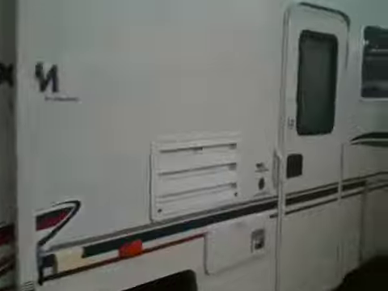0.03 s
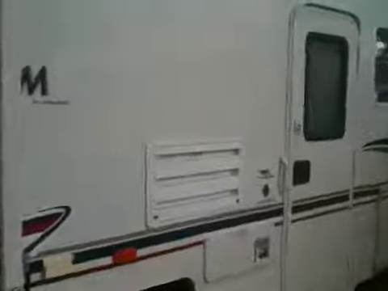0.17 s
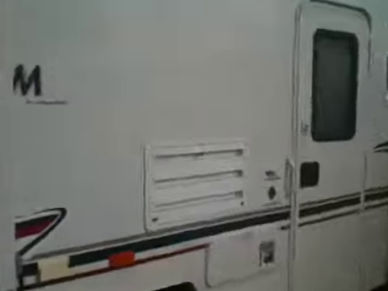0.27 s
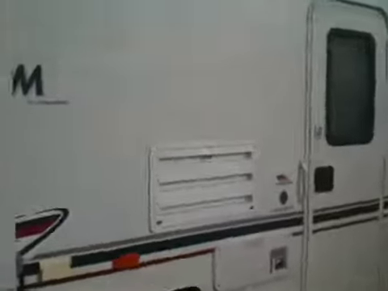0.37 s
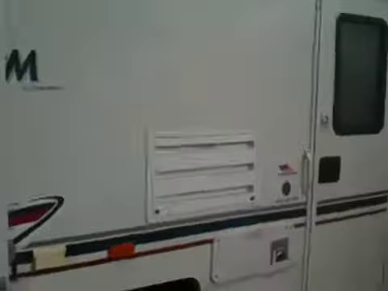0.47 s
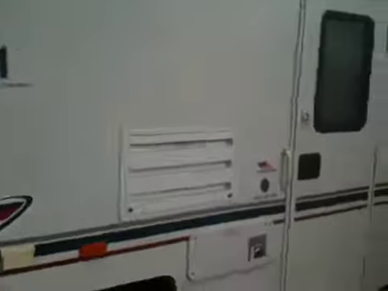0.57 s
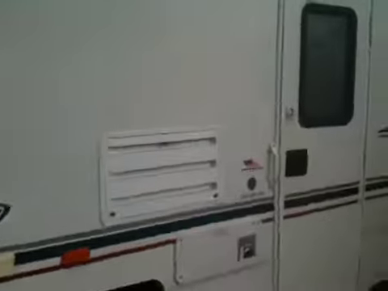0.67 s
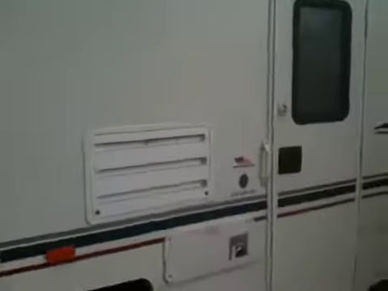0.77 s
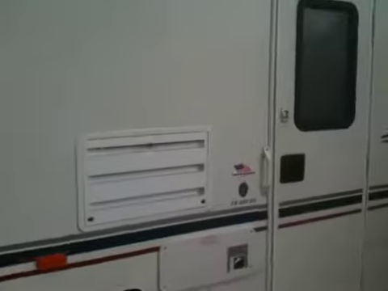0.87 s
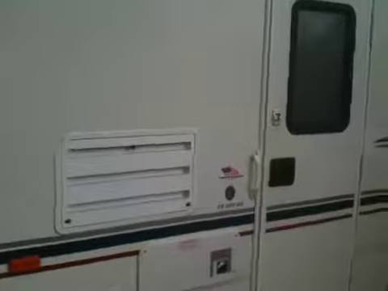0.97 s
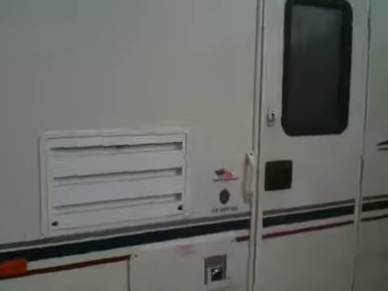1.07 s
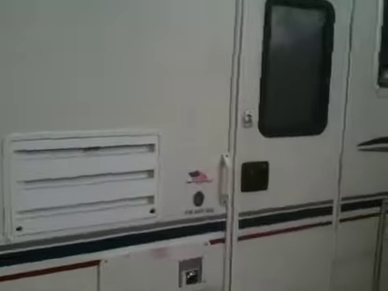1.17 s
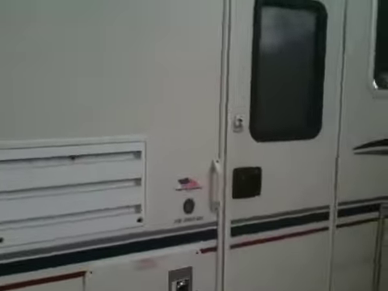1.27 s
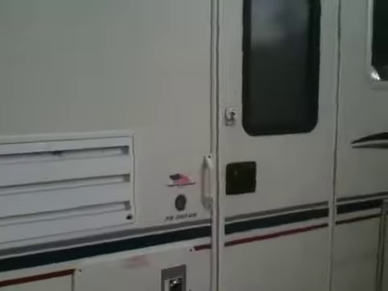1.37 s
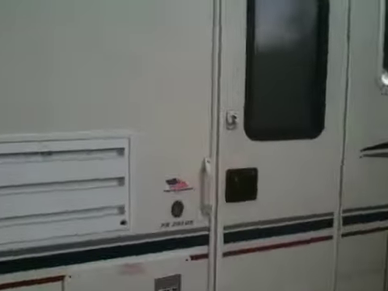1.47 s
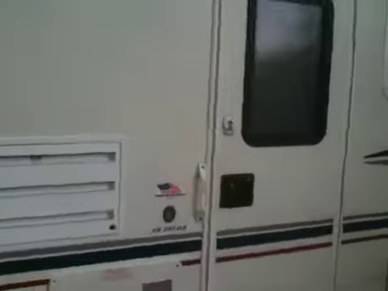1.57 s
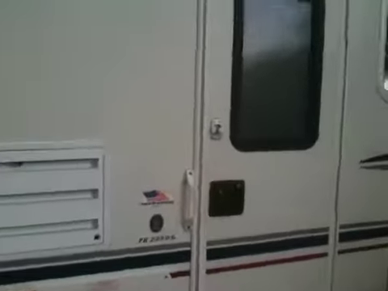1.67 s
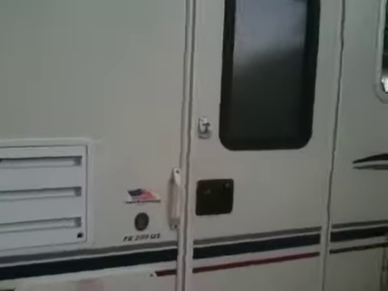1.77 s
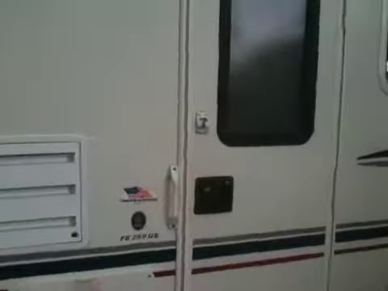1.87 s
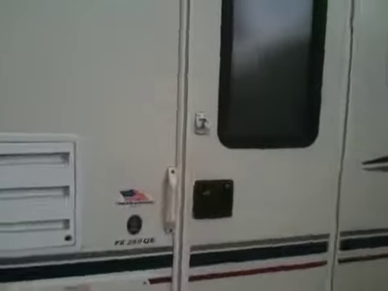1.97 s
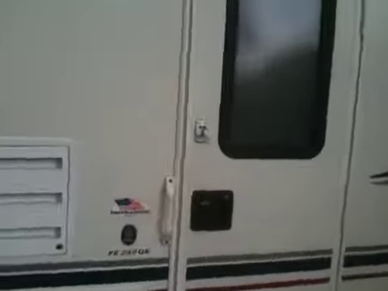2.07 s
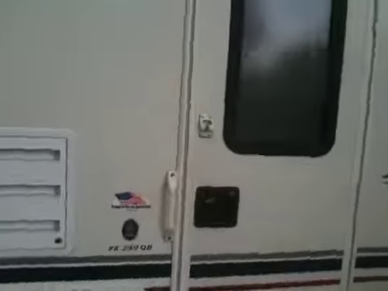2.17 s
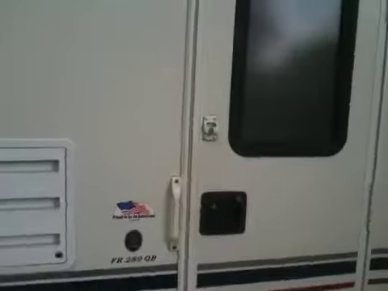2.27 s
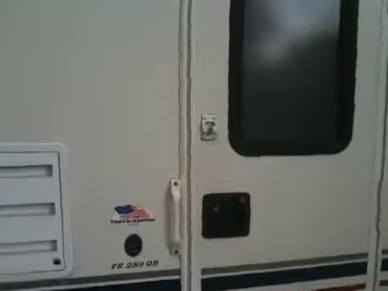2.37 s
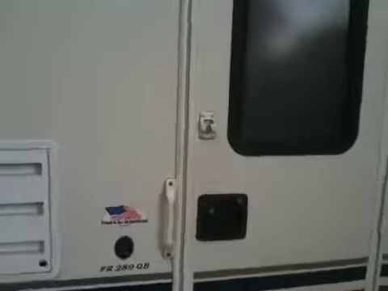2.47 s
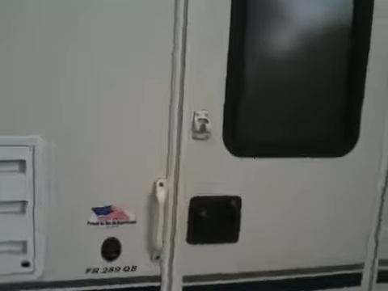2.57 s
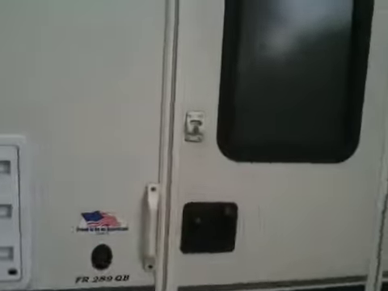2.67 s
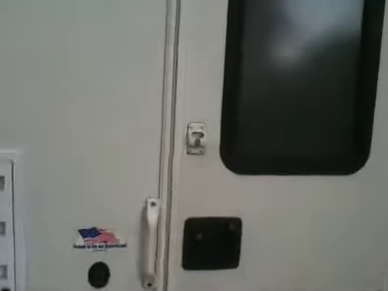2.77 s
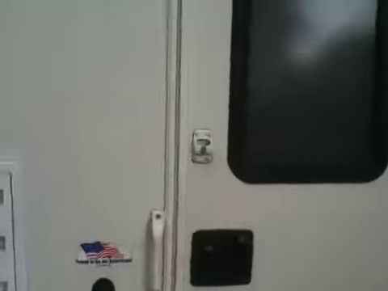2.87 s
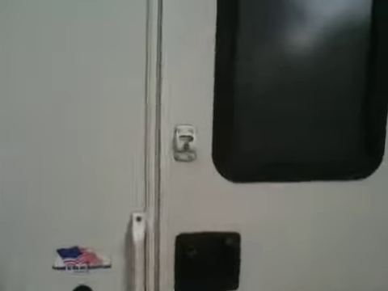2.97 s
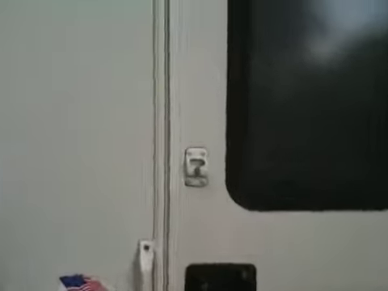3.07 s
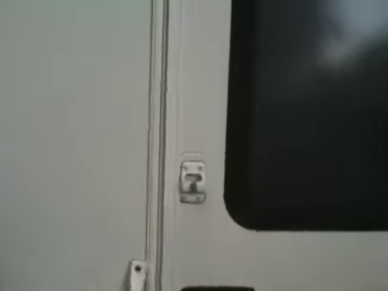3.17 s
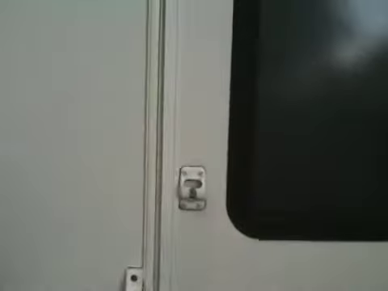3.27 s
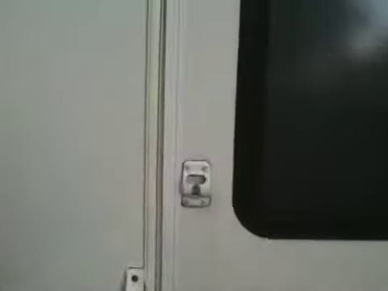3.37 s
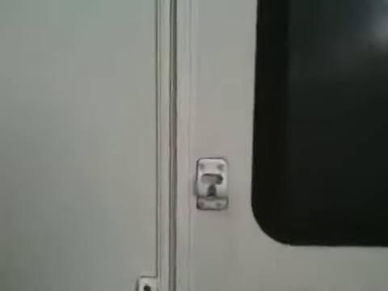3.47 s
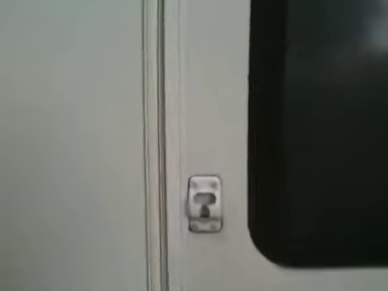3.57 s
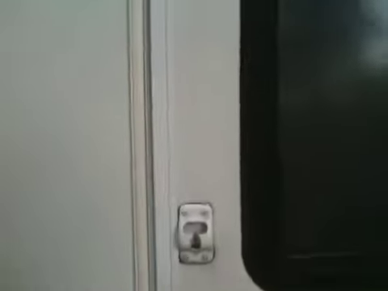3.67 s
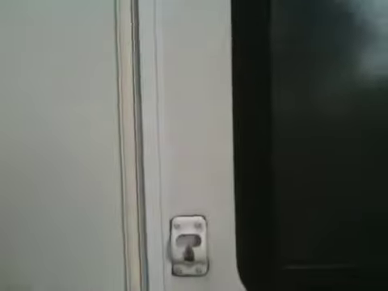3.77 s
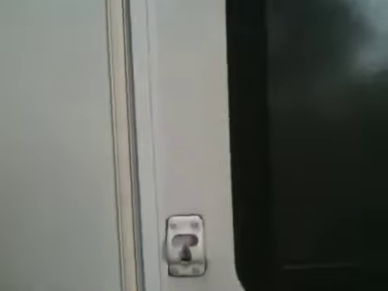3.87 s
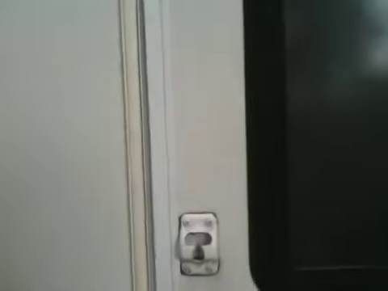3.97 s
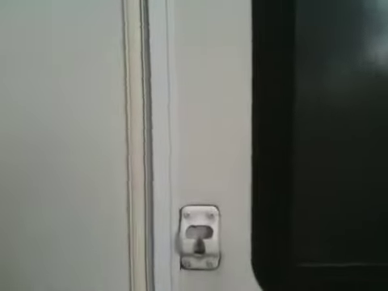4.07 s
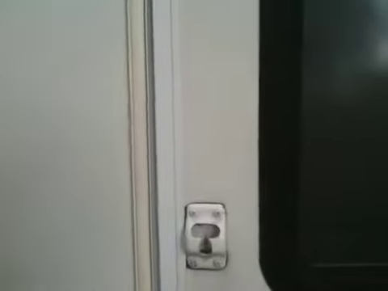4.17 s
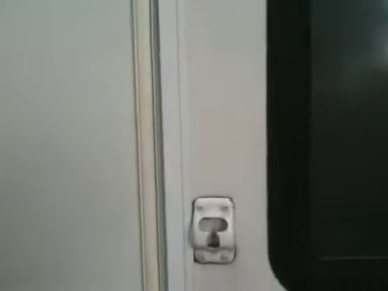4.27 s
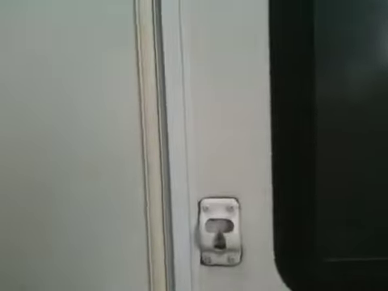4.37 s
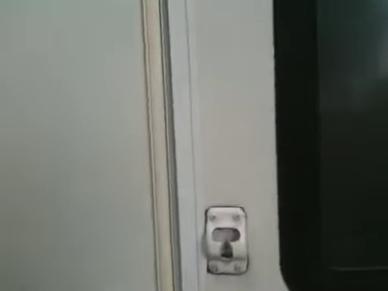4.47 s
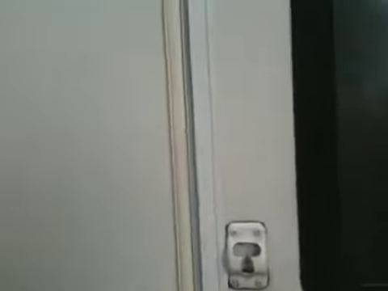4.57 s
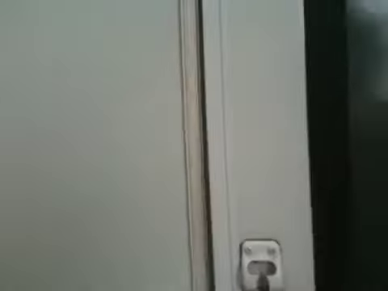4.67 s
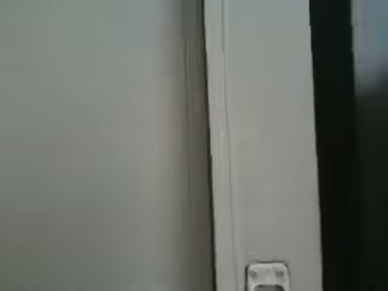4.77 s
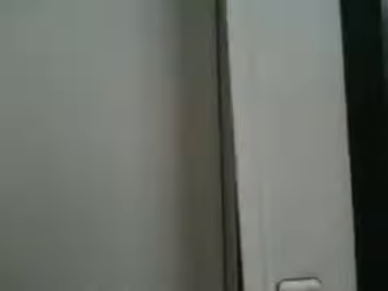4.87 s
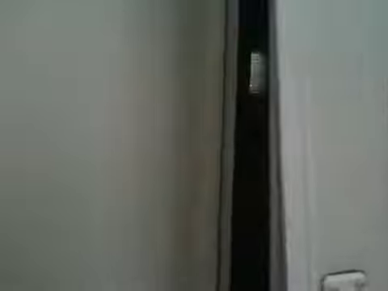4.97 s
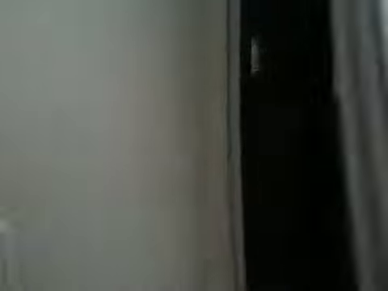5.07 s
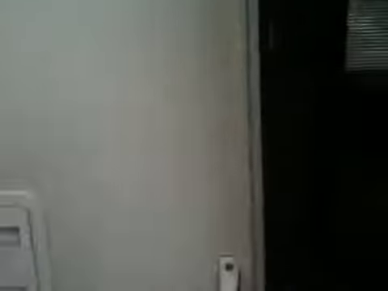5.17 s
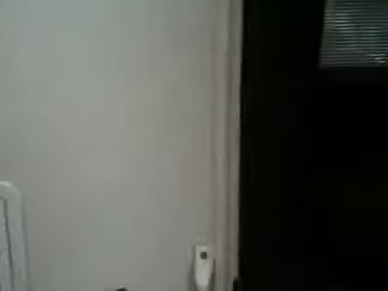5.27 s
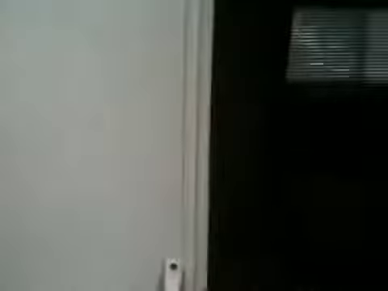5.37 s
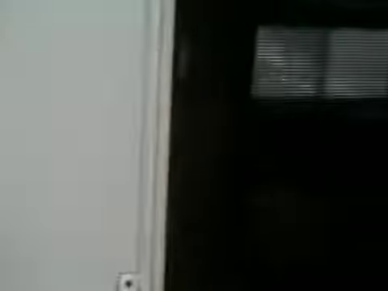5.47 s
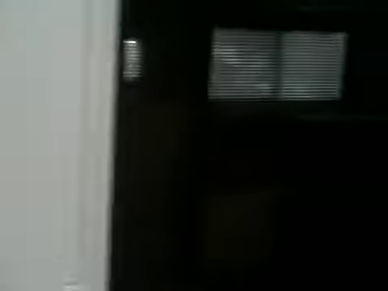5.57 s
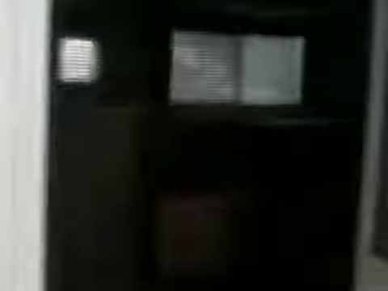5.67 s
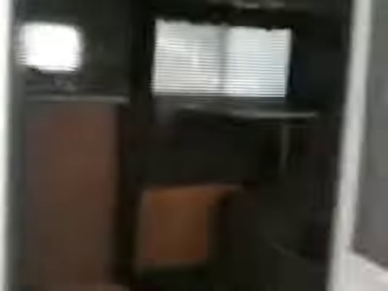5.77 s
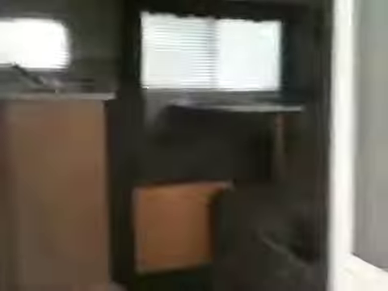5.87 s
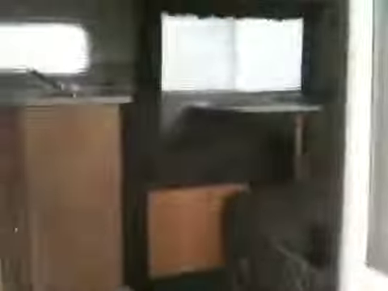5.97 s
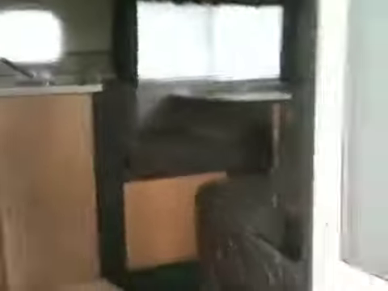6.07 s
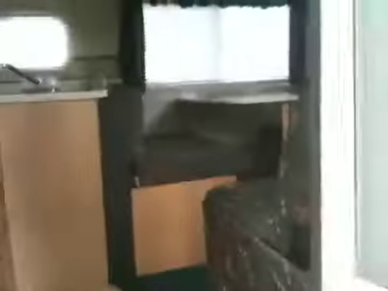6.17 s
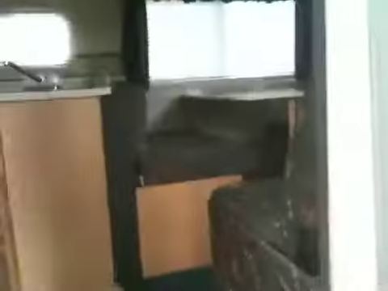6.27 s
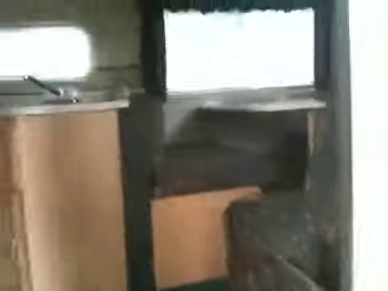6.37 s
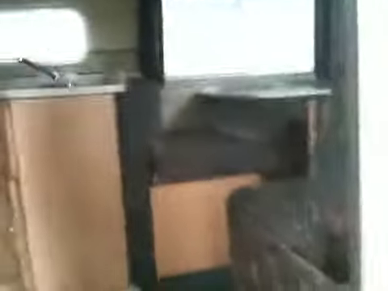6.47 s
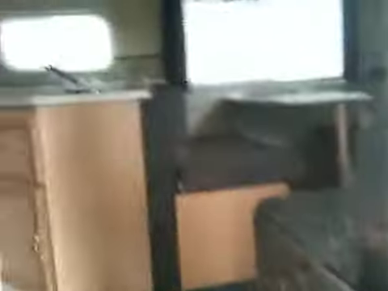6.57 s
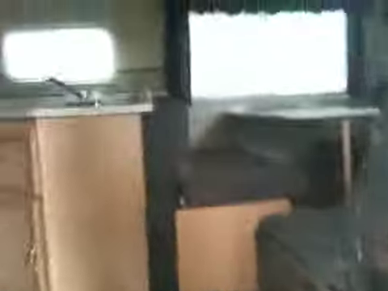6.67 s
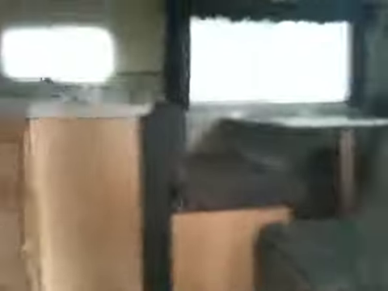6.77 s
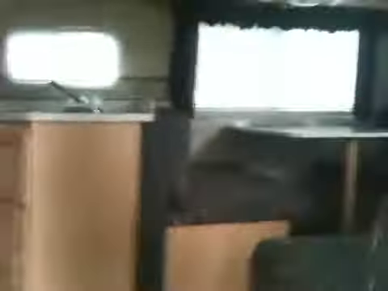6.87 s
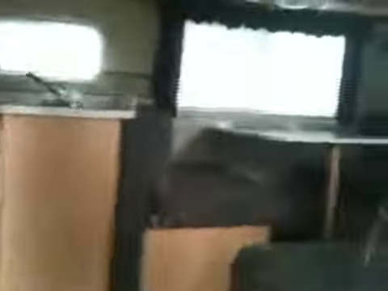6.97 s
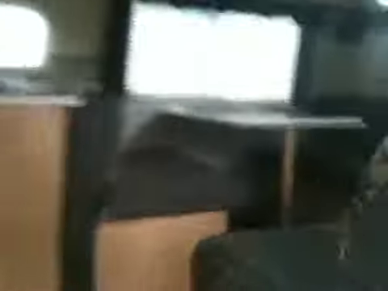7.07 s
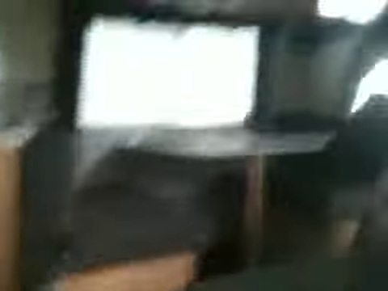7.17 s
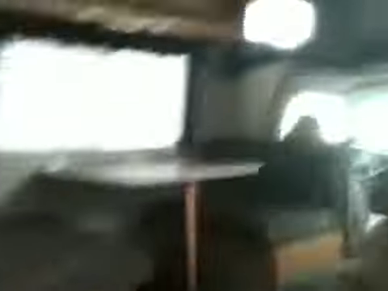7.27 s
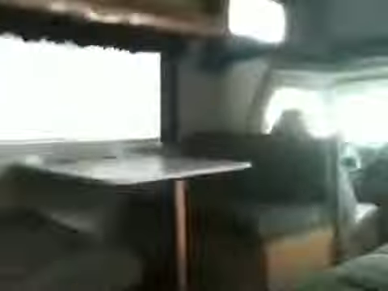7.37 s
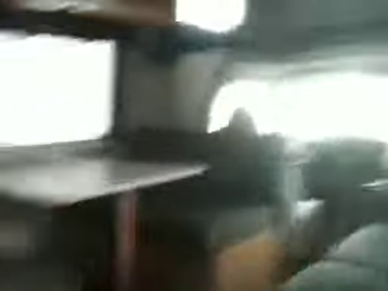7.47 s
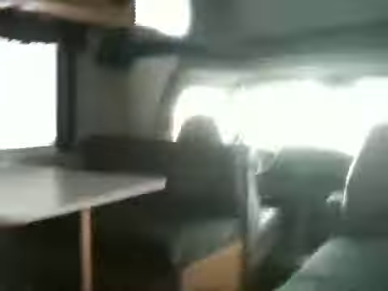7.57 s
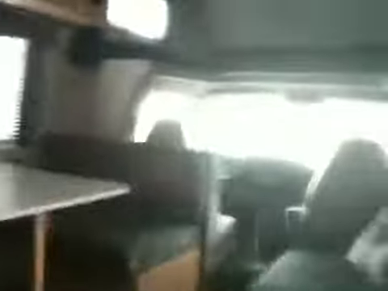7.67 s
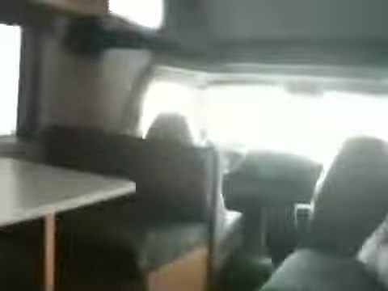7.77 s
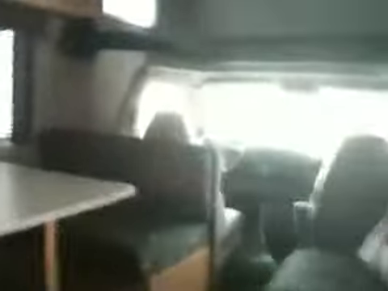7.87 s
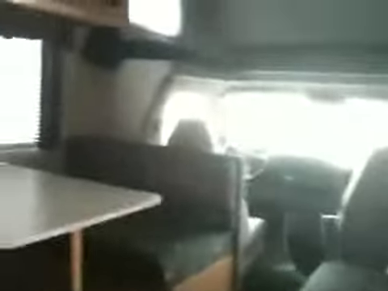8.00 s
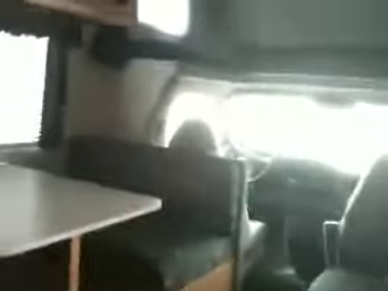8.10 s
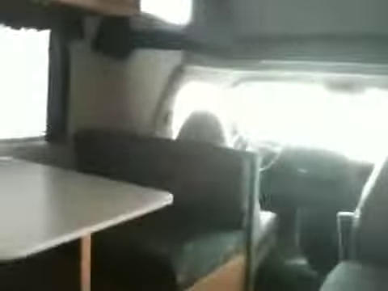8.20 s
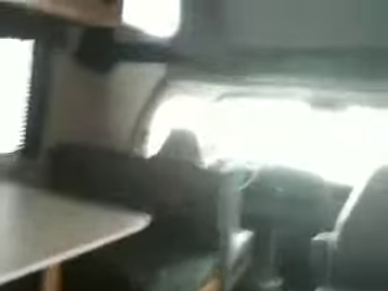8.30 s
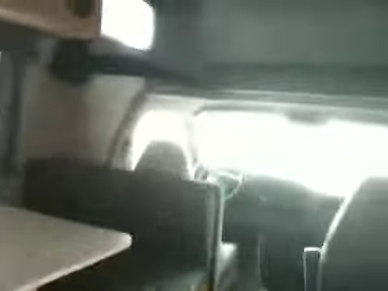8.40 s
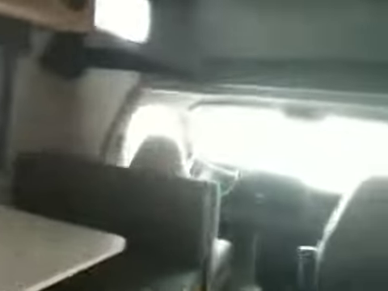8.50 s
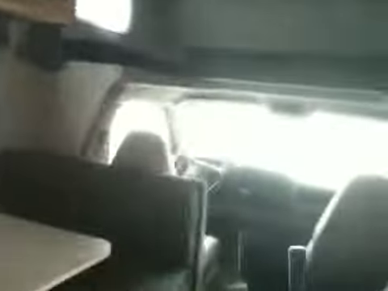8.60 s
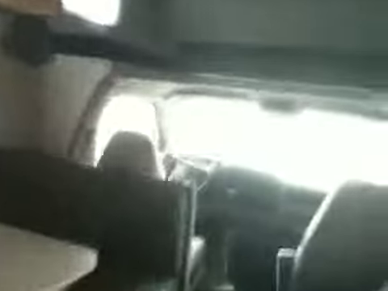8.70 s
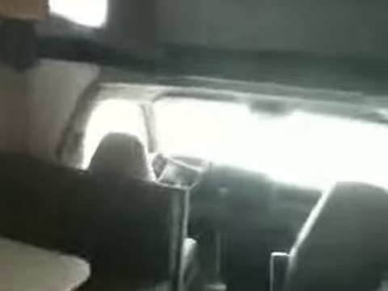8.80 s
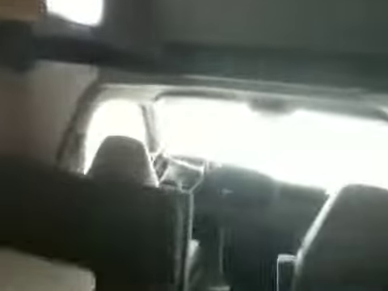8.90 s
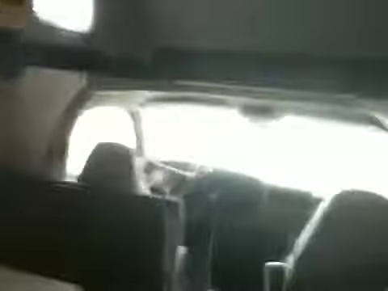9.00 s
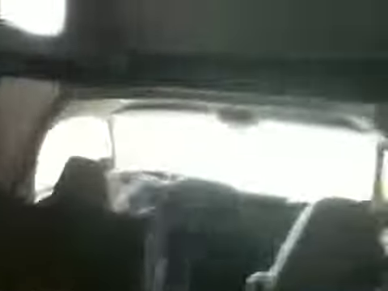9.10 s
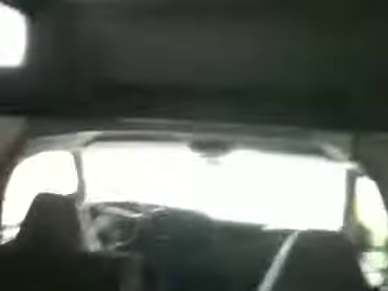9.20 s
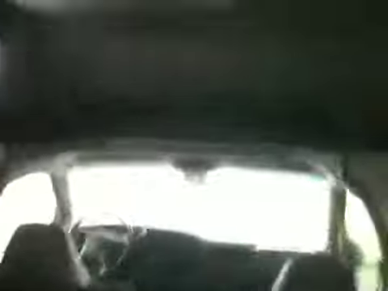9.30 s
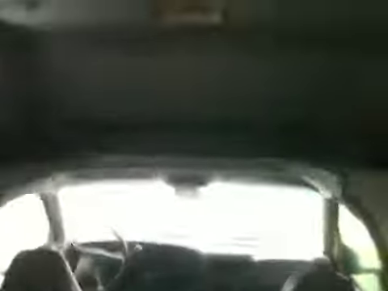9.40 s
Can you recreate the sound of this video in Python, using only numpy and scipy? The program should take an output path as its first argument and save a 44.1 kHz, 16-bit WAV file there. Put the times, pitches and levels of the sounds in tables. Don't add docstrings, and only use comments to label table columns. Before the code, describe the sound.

Low vehicle drone and passing tyre noise, soft scuffs, a sharp door catch, a bright step clank, then quieter indoors with a floor thump.

```python
import sys
import numpy as np
from scipy import signal
from scipy.fft import rfft, irfft
from scipy.io import wavfile
from scipy.ndimage import uniform_filter1d

SR = 44100
rng = np.random.default_rng(int(sys.argv[2]) if len(sys.argv) > 2 else 0)


def log_audio(samples):
    frames = np.atleast_2d(samples).T
    limited = np.clip(frames, -1, 1)
    pcm = np.round(limited * 32767).astype(np.int16)
    wavfile.write(sys.argv[1], SR, pcm)


def decibels_to_gain(level_db):
    exponent = np.asarray(level_db, float) / 20
    return 10 ** exponent


N = 416300


def evened(x):
    return x / np.sqrt(np.mean(x ** 2) + 1e-20)


def read(points, hz):
    f, value = np.transpose(points)
    return np.interp(np.log(hz + 1), np.log(f + 1), value)


def curves(rows, t):
    s, *columns = np.transpose(rows)
    return [np.interp(t, s, column) for column in columns]


def add(mix, s, sound):
    part = mix[round(s * SR):][:len(sound)]
    part += sound[:len(part)]


def strike(t, t60, rise):
    swell = 1 - np.exp(-t / max(rise, 1e-4))
    return swell * decibels_to_gain(-60 * t / max(t60, 5e-4))


def coloured(gain, size):
    spectrum = rfft(rng.standard_normal(size))
    return evened(irfft(spectrum * gain(np.fft.rfftfreq(size, 1 / SR)), size))


# [t/s, rumble level/dB, rumble centre f/Hz]
ENGINE_PASS = [(0, -45.5, 242), (.21, -50.5, 226), (1.4, -51, 200), (2.18, -50, 187), (2.55, -48, 177),
               (2.79, -50.5, 200), (3.13, -46.5, 215), (4.05, -54, 238), (4.6, -45.5, 277),
               (5.07, -47.5, 282), (5.31, -47, 273), (5.85, -48, 280), (6.36, -46, 252), (6.65, -50, 260),
               (7.15, -47, 232), (7.6, -56, 215), (8.4, -57.5, 200), (9.44, -67.5, 200)]
# [t/s, tyre roar level/dB, roar centre f/Hz]
TRAFFIC = [(0, -49.5, 1330), (1.6, -51.5, 1330), (2.0, -49, 1500), (2.38, -44.5, 1130), (2.62, -47, 1110),
           (2.98, -41, 1160), (3.2, -45, 1280), (3.55, -46, 1460), (4.41, -49, 1500), (5.0, -44, 1500),
           (5.22, -46, 1220), (5.78, -46.5, 1230), (6.07, -41, 1200), (6.7, -47, 1400), (7.15, -46, 1490),
           (7.76, -53, 1400), (8.6, -60.5, 1330), (9.44, -65.5, 1310)]
# [t/s, level/dB]
LEAVES = [(0, -55), (.2, -59), (.58, -58), (1.05, -65), (1.63, -60.5), (2.0, -64), (2.94, -67), (4.6, -68),
          (5.31, -59.5), (5.78, -64.5), (6.6, -64), (7.15, -62.5), (7.76, -65.5), (8.52, -73),
          (9.44, -72.5)]
# [f/Hz, level per Hz/dB]
RUMBLE_COLOUR = [(30, -28.5), (60, -27.5), (90, -10.5), (110, -0.5), (180, 5.5), (260, 2), (320, -2.5),
                 (420, -61)]
# [f/Hz, level per Hz/dB]
DRONE_COLOUR = [(220, -16.5), (300, 1), (370, 3), (430, 0), (520, -0.5), (620, 2), (760, -54.5)]
# [f/Hz, level per Hz/dB]
ROAR_COLOUR = [(450, -37.5), (620, -8.5), (720, 3.5), (850, 0), (1100, -3), (1500, -2.5), (1900, -4.5),
               (2350, -9.5), (2600, -31), (3500, -51)]
# [f/Hz, level per Hz/dB]
HISS_COLOUR = [(1500, -7.5), (2500, 3), (3500, -2), (5000, -3.5), (6000, -4), (7000, -8.5), (8500, -16),
               (11000, -36.5)]
# [f/Hz, level per Hz/dB]
FIZZ_COLOUR = [(5000, -2), (7000, 2), (8500, 0.5), (10500, -2), (12000, -8.5), (14000, -16.5),
               (15700, -20.5), (16500, -41)]


def air():
    hop = 256
    frames, hz = N // hop + 6, np.fft.rfftfreq(1024, 1 / SR)[:, None]
    t = np.arange(frames) * hop / SR
    real, imaginary, patches = rng.standard_normal((frames, 513, 3)).T
    patches = uniform_filter1d(patches, size=8, axis=0)
    patches = evened(uniform_filter1d(patches, size=24, axis=1))
    flicker = evened(uniform_filter1d(rng.standard_normal(frames), size=6))

    rumble_db, rumble_hz = curves(ENGINE_PASS, t)
    road_db, roar_hz = curves(TRAFFIC, t)
    breeze_db, = curves(LEAVES, t)
    engine_up_db, road_up_db, breeze_up_db = rumble_db + 50, road_db + 48, breeze_db + 65

    ajar = np.clip((t - 4.43) / 0.48, 0, 1)
    drone_db = -59.5 + 0.87 * engine_up_db + 6 * ajar
    hiss_db = -61 + 0.53 * road_up_db + 0.18 * breeze_up_db
    lift_db = 6 + 0.45 * road_up_db

    rumble_hump_db = 7 * np.exp(-((hz - rumble_hz) / 40) ** 2)
    roar_hump_db = lift_db * np.exp(-((hz - roar_hz) / 300) ** 2)
    layers = [(RUMBLE_COLOUR, rumble_hump_db, rumble_db), (DRONE_COLOUR, 0, drone_db),
              (ROAR_COLOUR, roar_hump_db, road_db), (HISS_COLOUR, 0, hiss_db), (FIZZ_COLOUR, 0, breeze_db)]
    power = 0
    for colour, hump_db, level_db in layers:
        shape = decibels_to_gain(read(colour, hz) + hump_db) ** 2 * np.ones(frames)
        power = power + shape / shape.sum(0) * decibels_to_gain(level_db) ** 2
    uneven_db = 1.5 * patches + 0.51 * flicker + 1.0
    z = (real + 1j * imaginary) * np.sqrt(power) * decibels_to_gain(uneven_db)
    return signal.istft(z, nperseg=1024, noverlap=1024 - hop)[1][:N]


def order(hz, level_db, waver):
    pitch_drift, level_drift = [evened(signal.resample(rng.standard_normal(count), N)) for count in (60, 120)]
    turns = np.cumsum(hz * (1 + waver * pitch_drift)) / SR
    return np.sqrt(2) * decibels_to_gain(level_db + 1.1 * level_drift) * np.sin(2 * np.pi * turns)


# [f/Hz, level/dB, nearest t/s, fade either side/dB per s, waver share]
BESIDE_ORDERS = [(117.7, -53.5, 1.46, 7, 0.0038), (231.7, -55.5, .1, 4, 0.011)]
BESIDE_GONE_S = 3.8, 2.6
# [multiple of firing f, waver share, level/dB outside, in the doorway, inside]
BODY_ORDERS = [(1, .003, -65.5, -60, -74), (1.5, .03, -65.5, -60, -67), (2, 0.0069, -65, -48.5, -61)]


def engine():
    firing_hz, doorway_s, step_up_s, step_in_s = 73.7, 6.8, 0.8, 0.74
    t = np.arange(N) / SR
    out = np.zeros(N)
    for (hz, db, near_s, fade_db, waver), gone_s in zip(BESIDE_ORDERS, BESIDE_GONE_S):
        away_db = -fade_db * abs(t - near_s) - 60 * np.clip(t - gone_s, 0, 2)
        out += order(hz, db + away_db, waver)

    far_db = 10 * np.minimum(t - 3.2, 0)
    inside = t > doorway_s
    doorway = np.exp(-((t - doorway_s) / np.where(inside, step_in_s, step_up_s)) ** 2)
    for multiple, waver, out_db, door_db, in_db in BODY_ORDERS:
        away_db = np.where(inside, in_db, out_db)
        out += order(multiple * firing_hz, far_db + away_db + (door_db - away_db) * doorway, waver)
    return out


def puffs(rows, rise_of):
    out, t = np.zeros(N), np.arange(8192) / SR
    for s, db, hz, width, t60 in rows:
        puff = coloured(lambda f: 1 / (1 + (2 * (f - hz) / width) ** 4), size=8192)
        envelope = strike(t, t60, rise_of(t60))
        add(out, s, decibels_to_gain(db - 12) * envelope / envelope.max() * puff)
    return out


# [t/s, peak level/dB, centre f/Hz, width/Hz, t60/s]
SHOE_SCUFFS = [
    (1.001, -48, 9700, 8040, 0.16),
    (1.501, -49.5, 6500, 3000, 0.33),
    (2.09, -48, 9950, 9000, 0.1),
    (3.28, -66, 12000, 6000, .06),
    (3.8, -60, 11900, 6000, .08),
    (9.285, -45.5, 1200, 2500, 0.13),
]


def scuffs():
    return puffs(SHOE_SCUFFS, lambda t60: 0.15 * t60)


# [t/s, peak level/dB, centre f/Hz, width/Hz, t60/s]
HARD_TICKS = [(1.014, -34.5, 8000, 7000, 0.0098), (3.314, -38, 5400, 1800, .015),
              (4.655, -27, 4960, 9000, 0.12), (4.6722, -22, 7510, 12000, 0.022),
              (4.674, -18, 1940, 2000, 0.025), (4.656, -36, 7510, 10000, 0.2),
              (4.655, -23.5, 1200, 1800, 0.08), (4.682, -42, 3520, 6200, 0.35),
              (8.333, -38, 1850, 900, 0.14), (5.145, -16, 6000, 9000, 0.046),
              (5.338, -39, 3000, 1500, 0.017), (6.233, -39, 4400, 2500, .02),
              (6.285, -34, 6500, 6000, 0.023), (6.292, -27, 7000, 6000, 0.05),
              (6.388, -39, 3400, 810, 0.022), (6.860, -34, 3900, 8700, 0.092),
              (6.961, -35, 6000, 12100, 0.0076), (6.978, -22, 6500, 10000, 0.0062),
              (7.1348, -13.5, 1490, 3000, 0.012), (7.1352, -36, 15100, 3040, 0.005),
              (7.0905, -38, 9000, 8000, .006), (8.0, -46.5, 3500, 2970, 0.061),
              (9.271, -50.5, 4500, 6000, 0.15)]


def ticks():
    return puffs(HARD_TICKS, lambda t60: 0.0062 * t60 ** 0.23)


def blows(rows):
    out, t = np.zeros(N), np.arange(SR // 2) / SR
    for s, db, hz, t60, rise in rows:
        envelope = strike(t, t60, rise) * (1 - np.exp(-t / rise))
        add(out, s, decibels_to_gain(db) * envelope / envelope.max() * np.sin(2 * np.pi * hz * t))
    return out


# [t/s, peak level/dB, f/Hz, t60/s, rise/s]
PANEL_THUMPS = [(4.474, -27, 162, 0.12, 0.0018), (4.6543, -6.5, 235, 0.013, 0.0045),
                (4.660, -17, 161, 0.04, 0.003), (4.675, -21, 209, 0.099, 0.0031),
                (4.690, -20, 166, 0.095, 0.0027), (4.66, -23.5, 355, 0.059, 0.0014),
                (5.165, -26, 161, 0.21, 0.0021), (5.172, -21, 222, 0.052, 0.0034),
                (6.301, -33.5, 222, 0.19, 0.003), (6.301, -40.5, 372, 0.11, 0.0022),
                (7.126, -37, 370, 0.053, 0.0011), (6.857, -45, 440, 0.033, 0.00085),
                (6.954, -27, 179.6, 0.25, 0.0082), (6.966, -34.5, 130, 0.07, .008),
                (7.256, -31, 177.4, 0.085, 0.0088), (7.301, -38.5, 197, 0.058, .010),
                (8.051, -42.5, 200, 0.073, 0.0072), (8.931, -46, 280.6, 0.033, 0.0048),
                (9.242, -29, 227.4, 0.016, 0.0032), (9.244, -31, 184, 0.18, 0.0035),
                (9.263, -29.5, 193, 0.036, .004), (9.241, -45, 493, 0.029, 0.00065),
                (1.014, -35.5, 201, 0.047, 0.0023), (1.446, -43, 216, 0.12, 0.0044),
                (5.151, -27, 154, 0.076, .003), (5.24, -36.5, 268, .12, .008), (5.285, -44, 285, .08, .008),
                (5.362, -35, 275, 0.14, 0.0048), (5.485, -38, 291, .09, .008),
                (5.55, -37, 288, 0.12, 0.0073), (5.61, -44, 165, 0.092, .008),
                (8.335, -23, 163, .07, 0.0036)]


def thumps():
    return blows(PANEL_THUMPS)


# [t/s, peak level/dB, f/Hz, t60/s]
PART_SNAPS = [(6.8547, -26, 3600, .006), (6.8556, -34, 1900, .012), (6.8594, -28, 1700, .012),
              (6.8596, -33, 3900, .005), (6.8596, -35, 6100, .004), (6.8598, -33, 600, .025),
              (6.9617, -24, 3700, .005), (6.9617, -34, 8300, .004), (6.9788, -24, 8000, .003),
              (6.9788, -30, 2300, .004), (7.0905, -28, 2200, .004), (7.0905, -27, 1500, .004),
              (7.0905, -34, 4300, .003), (7.1174, -26, 950, .010), (7.1252, -19, 620, .006),
              (7.1250, -31, 3100, .004), (7.1349, -13, 5600, .0009), (7.1351, -23, 2600, .003),
              (7.1351, -20, 750, .006), (7.1351, -23, 1700, .004), (7.1478, -27, 750, .014),
              (7.1500, -30, 1300, .02), (8.3310, -19, 1900, .010), (8.3310, -26, 3450, .009),
              (4.6545, -27, 520, .04), (4.6555, -30, 700, .05), (4.657, -33, 2100, .03),
              (4.666, -33, 2000, .02), (4.675, -35, 1150, .03), (4.6735, -27, 2000, .01),
              (6.2985, -11, 8680, .014), (8.3365, -29, 2050, .012), (8.340, -38, 3300, .012),
              (8.345, -35, 1900, .015), (8.356, -46, 3500, .015), (4.6725, -33, 13900, .01),
              (4.6735, -28, 7300, .006), (4.674, -30, 9200, .006), (4.6745, -29, 5800, .008),
              (4.6555, -36, 5400, .008), (4.656, -40, 9400, .006), (4.663, -37, 5600, .01),
              (4.6665, -35, 3000, .008), (4.678, -30, 2200, .012), (6.8556, -35, 2700, .006),
              (6.8596, -34, 2600, .006), (6.8596, -35, 1100, .012), (6.9600, -36, 600, .012),
              (6.2935, -30, 8600, .012), (6.2958, -29, 12500, .002), (6.2875, -40, 8300, .008),
              (6.2965, -24, 8000, .008), (6.301, -26, 1300, .03), (6.303, -30, 2100, .03)]


def snaps():
    return blows([(*row, 0.4 / row[2]) for row in PART_SNAPS])


# [t/s, length/s, f/Hz, level/dB]
HINGE_SQUEAKS = [
    (4.77, .1, 5950, -61),
    (6.70, .24, 6100, -66),
    (6.68, .1, 3150, -65),
    (4.676, .022, 13500, -52),
]


def squeaks():
    out = np.zeros(N)
    for s, length, hz, db in HINGE_SQUEAKS:
        t = np.arange(round(length * SR)) / SR
        add(out, s, decibels_to_gain(db) * np.hanning(len(t)) * np.sin(2 * np.pi * hz * t) * np.sqrt(2))
    return out


def hit(modes, crack, ring_db, crack_db, longest, crack_t60, tail_db, tail_t60, rise, rough):
    size = 16384
    t = np.arange(size) / SR
    ring = np.zeros(size)
    for hz, db, t60 in modes:
        envelope = decibels_to_gain(db) * strike(t, min(t60, longest), rise + 0.79 / hz)
        shake = 1 + rough * evened(signal.resample(rng.standard_normal(32), size))
        ring += envelope * shake * np.sin(2 * np.pi * (hz * t + rng.random()))
    snap = coloured(lambda f: decibels_to_gain(read(crack, f)), size) * strike(t, crack_t60, rise)

    spots_db = 2.5 * evened(signal.resample(rng.standard_normal(160), size // 2 + 1))

    def walls(f):
        return decibels_to_gain(read(crack, f) + spots_db) / (1 + (f / 11500) ** 6)

    tail = coloured(walls, size) * strike(t, tail_t60, 0.0012)
    return decibels_to_gain(ring_db) * ring + decibels_to_gain(crack_db) * snap + decibels_to_gain(tail_db) * tail


# [f/Hz, level/dB, t60/s]
CATCH_MODES = [(382, -5, 0.15), (600, -9, 0.033), (757, -12, 0.045), (883, -2, .06), (1127, -3.5, .05),
               (1180, -2.5, 0.066), (1330, -9, 0.068), (1503, -5, 0.088), (2148, -9.5, 0.04),
               (2760, -4.5, 0.036), (3700, -6, 0.044), (4850, -10, 0.042), (5130, -32, 0.043),
               (6200, -13.5, .03), (6300, -6.5, 0.053), (7210, 1.5, 0.031), (8700, -13.5, 0.088),
               (9160, -25, 0.051), (9900, 6.5, 0.025), (11900, -40.5, 0.039), (12300, -15.5, .04),
               (12850, -12, 0.048), (14470, -22.5, 0.12)]
# [f/Hz, level per Hz/dB]
CATCH_NOISE = [(120, -28.5), (200, -2.5), (1560, 0), (2000, -9), (3250, -14), (3690, -9), (4350, -12.5),
               (4600, -5.5), (8420, -14), (9750, -11.5), (12800, -16.5), (16000, -28)]


def door_catch():
    return hit(CATCH_MODES, CATCH_NOISE, ring_db=-16.5, crack_db=-9.5, longest=0.19, crack_t60=0.045,
               tail_db=-27.5, tail_t60=0.2, rise=0.00028, rough=0.3)


# [f/Hz, level/dB, t60/s]
STEP_MODES = [(2977, -9, 0.064), (3420, -1.5, 0.028), (4930, -25.5, 0.13), (5430, -4.5, 0.021),
              (6480, 0, 0.032), (7900, -7.5, .03), (8800, -9, 0.055), (9916, -19.5, 0.023),
              (10300, -11, 0.06), (11500, -17, 0.09), (11830, -16, 0.0306), (14250, -6, .015)]
# [f/Hz, level per Hz/dB]
STEP_NOISE = [(240, -30), (400, 0.5), (1460, -10), (2320, -7.5), (3420, -2.5), (4730, -6), (6640, -3.5),
              (7280, -0.5), (14400, -7.5), (16000, -16)]


def metal_step():
    return hit(STEP_MODES, STEP_NOISE, ring_db=-16.5, crack_db=-12, longest=0.11, crack_t60=0.026,
               tail_db=-32.5, tail_t60=0.18, rise=0.00086, rough=0.3)


# [f/Hz, level/dB, t60/s]
FLOOR_MODES = [(117, -12.5, 0.55), (150.6, -5, 0.26), (169.6, 1.5, 0.23), (230, -4, 0.45),
               (285, -6.5, 0.26), (366, -5, 0.23), (418, -14, 0.25), (482, -18.5, 0.46), (590, -18, 0.33),
               (690, -33, 0.091), (824, -16, 0.29), (1320, -22.5, 0.16), (1833, -10, 0.08),
               (2080, -19, .05), (3300, -22, 0.048)]
# [f/Hz, level per Hz/dB]
FLOOR_NOISE = [(350, -18), (600, 2), (1160, -14), (1890, -2), (2520, -12.5), (3370, -18), (4570, -23),
               (12000, -32.5), (14000, -50)]


def floor_thump():
    return hit(FLOOR_MODES, FLOOR_NOISE, ring_db=-23.5, crack_db=-32, longest=0.62, crack_t60=0.014,
               tail_db=-36.5, tail_t60=0.19, rise=0.00038, rough=0.48)


def scene():
    out = air() + engine() + scuffs() + ticks() + thumps() + snaps() + squeaks()
    add(out, 5.1479, door_catch())
    add(out, 6.2982, metal_step())
    add(out, 8.3305, floor_thump())
    return out[None]


def roll_off(x):
    return signal.sosfilt(signal.butter(12, 16660, fs=SR, output="sos"), x)


def record(dry):
    limit = 0.95
    hiss = decibels_to_gain(-85.0) * np.diff(rng.standard_normal(N + 2), 2)
    thin = signal.sosfilt(signal.butter(4, 84, "high", fs=SR, output="sos"), dry + hiss)
    rounded = limit * np.tanh(thin / limit)
    edge = signal.firwin(255, 16400, window=("kaiser", 9), fs=SR)
    mix = signal.oaconvolve(rounded, edge[None], "same")
    return roll_off(mix)


dry = scene()
out = record(dry)
log_audio(out)
```